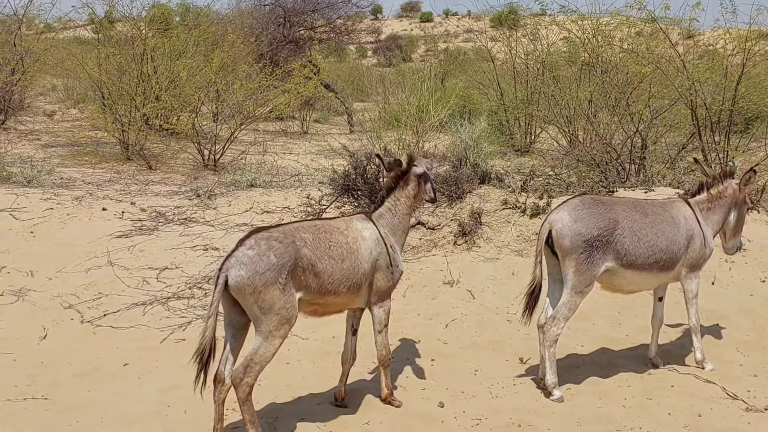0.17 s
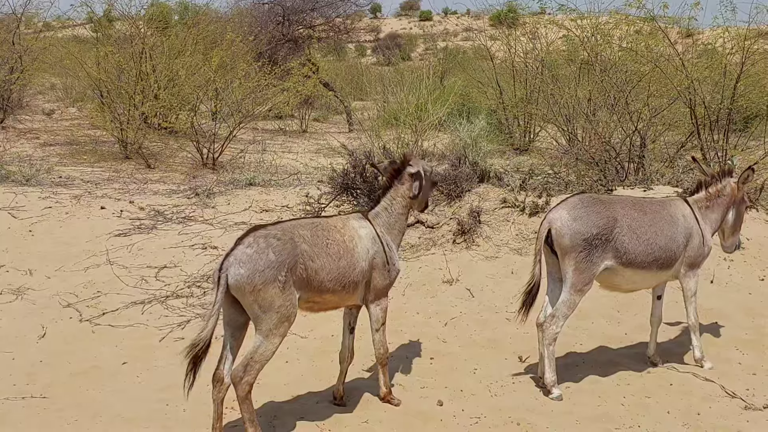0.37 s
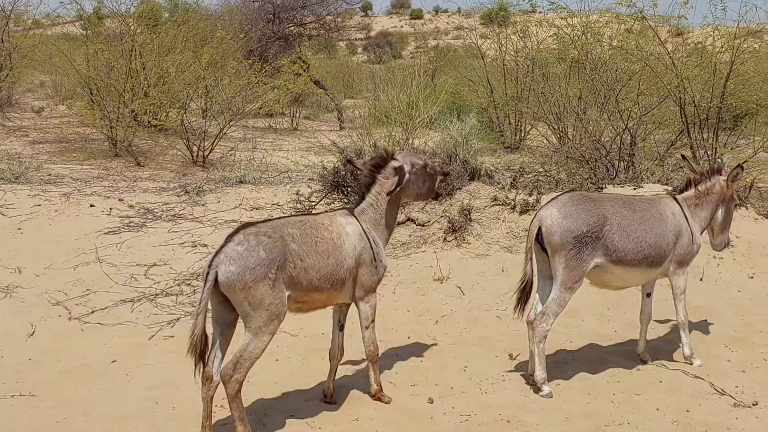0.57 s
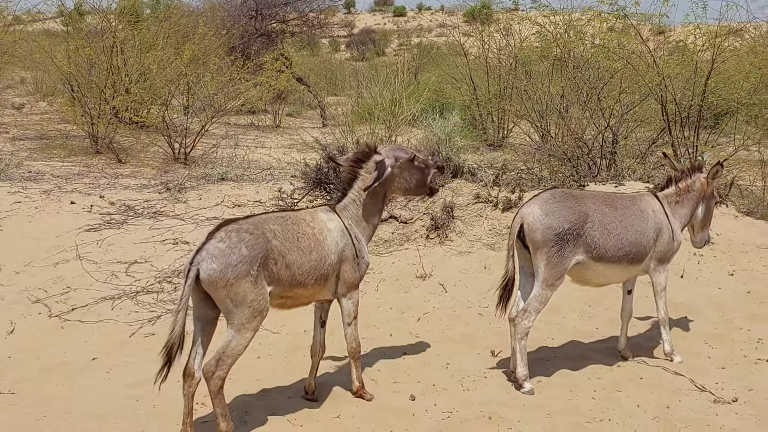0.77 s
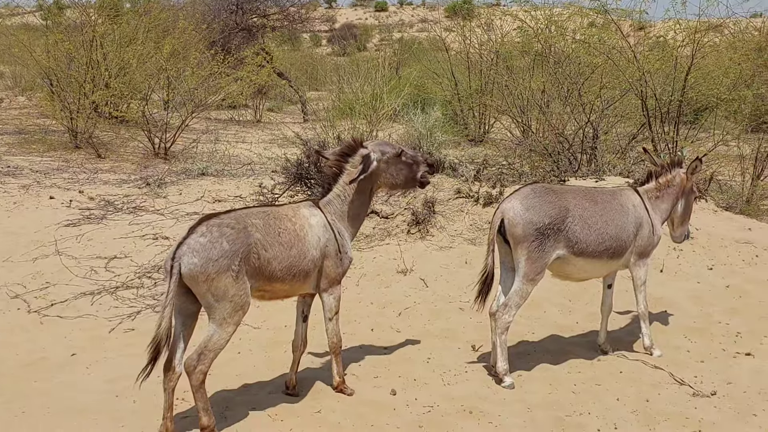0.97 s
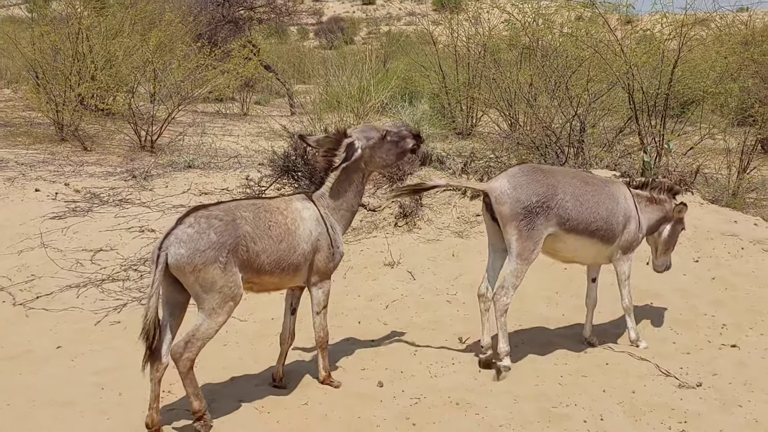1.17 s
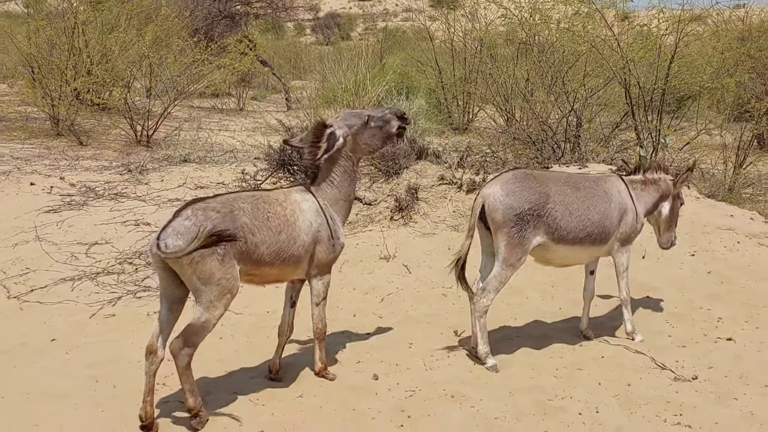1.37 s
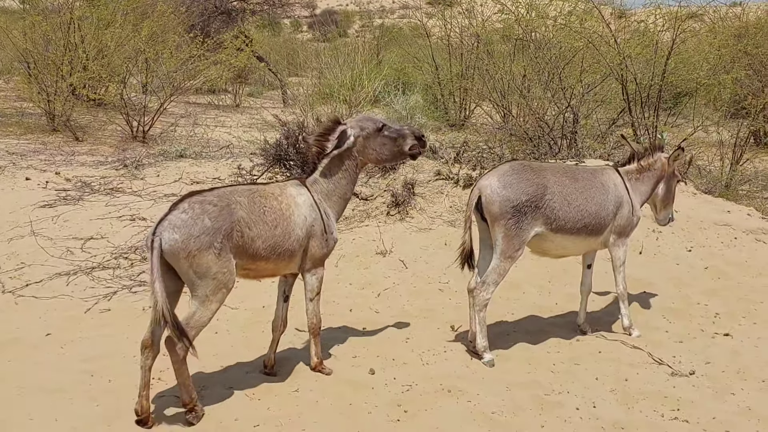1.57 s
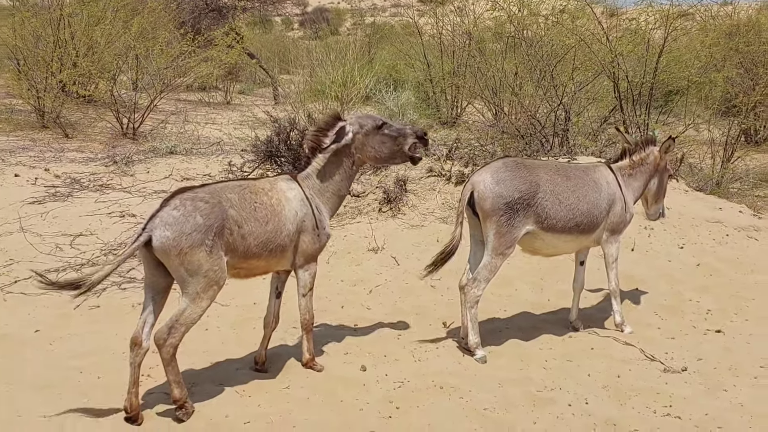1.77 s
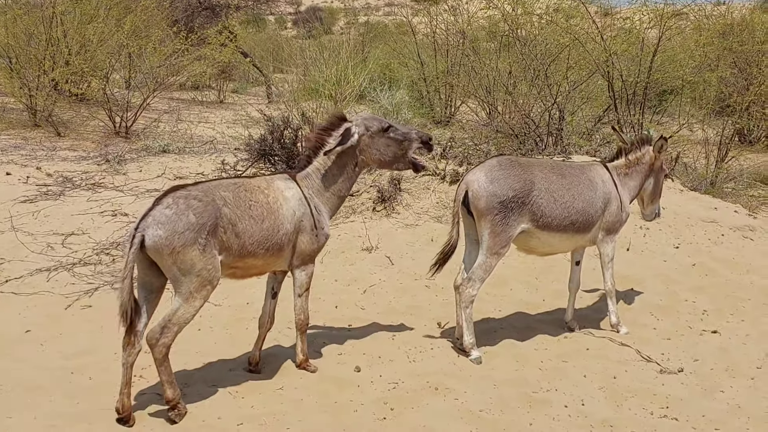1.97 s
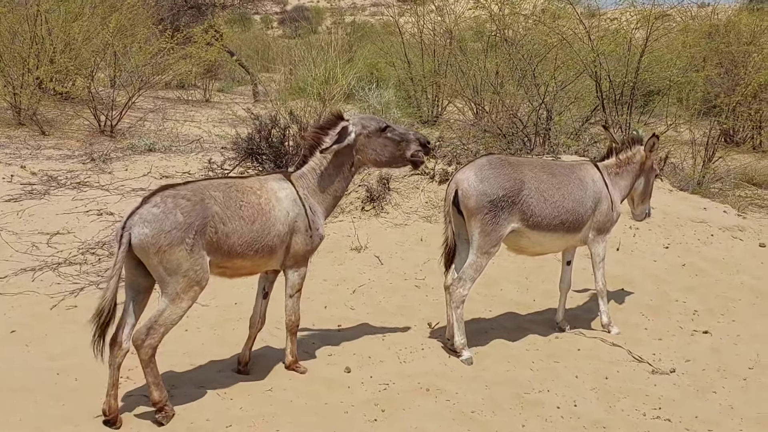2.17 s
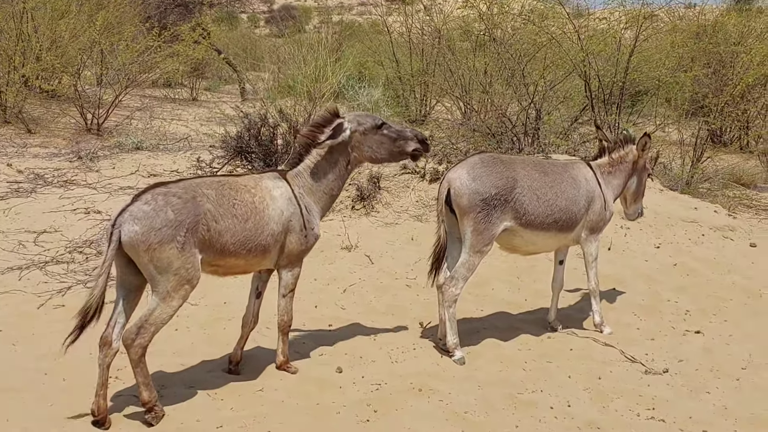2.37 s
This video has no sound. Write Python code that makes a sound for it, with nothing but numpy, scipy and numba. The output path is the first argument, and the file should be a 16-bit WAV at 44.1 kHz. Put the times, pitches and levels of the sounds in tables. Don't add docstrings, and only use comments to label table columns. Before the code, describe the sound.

A donkey brays close by, three wheezing hee-haws with whistling in-breaths and hoarse fluttering out-breaths

```python
import sys
import numpy as np
from scipy import signal
from scipy.fft import rfft, irfft
from scipy.io import wavfile
from scipy.ndimage import uniform_filter1d
from numba import njit

SR = 44100
rng = np.random.default_rng(int(sys.argv[2]) if len(sys.argv) > 2 else 0)


def boost_factor(decibels):
    exponent = np.asarray(decibels, float) / 20
    return 10 ** exponent


def waveform_to_disk(signal):
    frames = np.transpose(np.atleast_2d(signal))
    scaled = np.clip(frames, -1, 1) * 32767
    samples = np.round(scaled).astype(np.int16)
    wavfile.write(sys.argv[1], SR, samples)


N = 112455
ABOVE_DB = -16.5


@njit
def svf(x, hz, width):
    y, b, l = np.zeros(len(x)), 0., 0.
    for i in range(len(x)):
        if x[i] != 0:
            g, k = np.tan(np.pi * hz[i] / SR), width / hz[i]
            v = (b + g * (x[i] - l)) / (1 + g * (g + k))
            b, l, y[i] = 2 * v - b, l + 2 * g * v, k * v
    return y


def band(x, hz, width):
    hz = hz * np.ones(N)
    return svf(svf(x, hz, 1. * width), hz, 1. * width)


def unit(x):
    return x / np.sqrt(np.mean(x ** 2))


def walk(rate_hz):
    k = max(int(SR / rate_hz), 1)
    return unit(uniform_filter1d(uniform_filter1d(rng.standard_normal(N), k), k))


def tracks(rows):
    t, rows = np.arange(N) / SR, np.array(rows)
    is_open = (t > rows[0, 0]) & (t <= rows[-1, 0])
    gate = uniform_filter1d(1. * is_open, size=200, mode="nearest")
    return gate, [np.interp(t, rows[:, 0], c) for c in rows.T[1:]]


def brays():
    # t/s, level/dB, pitch/Hz, mouth resonance f/Hz
    grunt_1 = [
        (.04, -52, 297, 1000),
        (.06, -27.5, 307.7, 941),
        (.135, -41.5, 274.3, 825),
    ]
    haw_1 = [
        (.372, -51.5, 181, 1000),
        (0.384, -23.5, 181.4, 992),
        (0.419, -18.5, 192.2, 797),
        (.443, -23.5, 218.4, 1070),
        (0.474, -14.5, 293.5, 955),
        (.5, -31.5, 312, 993),
    ]
    grunt_2 = [
        (0.553, -47, 297.3, 955),
        (0.564, -30.5, 323.3, 912),
        (0.619, -42.5, 282.3, 817),
    ]
    haw_2 = [
        (.878, -40.5, 289.4, 753),
        (.893, -19.5, 300.9, 1126),
        (0.927, -14, 295.1, 1200),
        (1.001, -17, 280.1, 1111),
        (1.098, -26, 256.7, 826),
        (1.12, -32.5, 261.6, 1010),
        (1.148, -30, 248.8, 1185),
        (1.19, -74, 260, 1156),
    ]
    creak = [
        (1.189, -45, 61.2, 1180),
        (1.3, -52, 62.4, 1157),
        (1.45, -42, 58.7, 770),
        (1.7, -47.5, 61.54, 737),
    ]
    grunt_3 = [
        (1.73, -40, 293.6, 926),
        (1.748, -26.5, 283, 767),
        (1.8, -48, 274.7, 740),
    ]
    cluck = [
        (2.018, -50.5, 290, 865),
        (2.027, -32.5, 291, 850),
        (2.037, -49.5, 277, 840),
    ]
    haw_3 = [
        (2.136, -52.5, 215.4, 620),
        (2.163, -29.5, 215.2, 596),
        (2.195, -21, 228.9, 808),
        (2.205, -18, 230.6, 760),
        (2.3, -24.5, 254.1, 683),
        (2.412, -42, 226.3, 700),
        (2.55, -28, 243.6, 699),
    ]
    # t/s, level/dB
    gasp_levels = [
        [(.125, -55), (.145, -44), (.31, -46), (.33, -64.5)],
        [(.585, -57), (.67, -42.5), (.81, -47.5), (.825, -50.5)],
        [(1.795, -59.5), (1.84, -49), (1.95, -46.5), (1.995, -42.5), (2.02, -45), (2.058, -42), (2.09, -67.5)],
    ]
    gasps = [[(s, db, 300, 819) for s, db in rows] for rows in gasp_levels]

    # chest tone/dB, throat/dB, nose/dB, treble/dB, half-pitch share, treble change/dB
    colours = [
        (-21, -13, -11, -22, 0.52, -5.5),
        (-18, -9, -5, -22.5, .5, 6),
        (0.5, -5, -13, -32, 0.56, 0.5),
        (-5, 0.5, -7, -36, 0.39, 0.5),
        (3, 2, -12.5, -29, .07, -4.5),
        (-41, 9, -7.5, -29.5, -0.9, 3.5),
        (-29, -7, -6, -0.5, 0, -7),
        (-29, 1.5, -3.5, 7, 0, -24),
    ]
    ragged = [(.15, .75, 0, .3), (.2, .8, 0, .3), (.3, .55, .1, .2), (.4, .8, 0, .9), (.7, .4, .45, .9),
              (.9, .9, .2, .1), (1, 1, .3, .3), (1, 1, .2, .2)]
    throat_hz = [710, 608, 620, 700, 638.4, 585, 620, 647]
    nose_hz = [1477, 1467, 1750, 1685, 1477, 1573, 1368, 1505]
    # mouth, throat, nose resonance width/Hz
    widths = [(207.4, 230, 440), (172, 41, 130), (260, 200, 180), (270, 170, 92), (190, 142, 120),
              (260, 200, 150), (173, 47, 290), (166, 120, 660)]
    # f/Hz, width/Hz, level/dB
    upper = [
        [(2354, 390, -2.5), (3270, 410, -5), (4200, 440, -8.5), (4930, 320, -8.5), (5800, 510, -18.5)],
        [(2500, 295, -1), (3160, 730, -5.5), (4010, 410, -2.5), (4680, 270, -8.5), (5840, 1700, -13.5)],
        [(2105, 230, 2.5), (3180, 120, 4.5), (4400, 230, -7), (4800, 290, -7.5), (9000, 15000, -12.5)],
        [(1870, 150, 17), (3250, 220, -17), (4216, 350, -2.5), (4850, 550, -3.5), (5740, 1000, -8)],
        [(2550, 350, 6), (2940, 58, 4.5), (3330, 410, 1.5), (4330, 400, -10), (5600, 360, -8)],
    ]
    breath_in, breath_out = upper[:2], upper[2:]
    by_kind = breath_in + breath_out + upper[-1:] + breath_in
    kinds = zip(colours, ragged, throat_hz, nose_hz, widths, by_kind)
    calls = [[grunt_1, grunt_2], [grunt_3], [haw_1], [haw_2], [haw_3, cluck], [creak], gasps[:2], gasps[2:]]
    return sum(voice(rows, *kind) for group, kind in zip(calls, kinds) for rows in group)


def voice(rows, colour, ragged, throat_hz, nose_hz, widths, upper):
    gate, (db, hz, mouth_hz) = tracks(rows)
    chest_db, throat_db, nose_db, treble_db, half, change_db = colour
    mouth_width, throat_width, nose_width = widths
    along = np.cumsum(gate) / np.sum(gate)
    rough = ragged[0] + (ragged[1] - ragged[0]) * along
    depth = ragged[2] + (ragged[3] - ragged[2]) * along

    phase = np.cumsum(hz * (1 + .12 * rough * walk(150))) / SR
    cycle = phase.astype(int)
    size = boost_factor(4 * rough * rng.standard_normal(N // 20)[cycle]) * (1 - half * (cycle % 2))
    clicks = np.diff(cycle, prepend=0) * size * np.sqrt(SR / hz)
    puffs = .5 + 1.2 * np.exp(-(phase % 1) / .3)
    air = rng.standard_normal(N) * puffs * (gate > 0)
    source = (np.sqrt(1 - rough ** 2) * clicks + rough * air + 1e-9) * (gate > 0)

    low = band(source, mouth_hz, mouth_width) + boost_factor(throat_db) * band(source, throat_hz, throat_width)
    scale = 1 / np.sqrt(np.sum(gate * low ** 2) / np.sum(gate))
    high = np.zeros(N)
    for k, (f, width, gain_db) in enumerate(upper):
        patchy = boost_factor(gain_db + 3 * walk(8.4) + change_db * along)
        high += (-1) ** k * patchy * band(.5 * source + air, f, width)
    nose = band(source, nose_hz, nose_width) * boost_factor(nose_db + 2 * walk(31))
    nose = nose + boost_factor(nose_db - 20 + 2.5 * walk(60)) * band(source, nose_hz, 1396)
    chest_level = boost_factor(chest_db + 4.8 * rough * walk(90)) * (1 - rough) ** 1.92
    chest = chest_level * np.sqrt(2) * np.sin(2 * np.pi * phase)

    flap, flap_db = flaps(gate)
    flap_opening = np.sin(np.pi * flap ** 0.6) ** 2 * boost_factor(flap_db)
    flutter = 1 - depth + depth * 1.33 * flap_opening
    throat = (low - nose) * flutter + boost_factor(treble_db) * high * flutter ** 0.64
    return gate * boost_factor(db) * (scale * throat + chest * np.sqrt(flutter))


def flaps(gate):
    # t/s, strength/dB
    flap_times = [(0.999, -5.5), (1.016, -8), (1.036, -6.5), (1.057, 4), (1.078, -0.5), (1.097, 4.5),
                  (1.116, 2.5), (1.138, 0), (1.167, 5), (1.188, 0), (2.148, -2.5), (2.184, -9), (2.203, 0),
                  (2.217, 1.5), (2.242, -1.5), (2.269, 1.5), (2.291, 0), (2.314, -5), (2.338, -11.5),
                  (2.361, 0), (2.39, -5.5), (2.408, 1), (2.428, 2), (2.444, 5.5), (2.47, 2.5), (2.492, 0.5),
                  (2.511, -4.5), (2.529, -3.5), (2.552, 0)]
    t, (s, db) = np.arange(N) / SR, np.array(flap_times).T
    count = np.interp(t, s, np.arange(len(s)))
    k = np.minimum(count.astype(int), len(s) - 2)
    listed = (t > s[0]) & (s[k + 1] - s[k] < .05)
    flutter_hz = 45 * (1 + 0.073 * walk(28))
    free = np.cumsum((gate > .5) * flutter_hz) / SR % 1
    return np.where(listed, count % 1, free), np.where(listed, db[k], 5.0 * walk(36))


def whistles():
    # t/s, high tone f/Hz, high tone level/dB, low tone f/Hz, low tone level/dB
    hees = [
        [(.128, 5500, -50.5, 2750, -52), (.168, 5680, -41.5, 2755, -29), (.215, 5350, -31.5, 2700, -39.5),
         (.25, 5510, -39, 2740, -30), (.3, 5330, -40, 2600, -44.5), (.33, 5430, -53, 2600, -54.5),
         (.55, 5410, -69, 2600, -73)],
        [(.61, 5260, -53, 2700, -67.5), (.638, 5410, -41, 2715, -32.5), (.675, 5530, -34.5, 2700, -30),
         (.72, 5400, -40.5, 2600, -40), (.8, 5450, -54, 2650, -45.5), (.83, 5400, -66, 2650, -72),
         (.88, 5400, -65, 2650, -51.5)],
        [(1.805, 5250, -51, 2600, -58), (1.835, 5405, -36, 2740, -29), (1.86, 5510, -34, 2770, -32.5),
         (1.9, 5420, -18.5, 2670, -31.5), (1.93, 5337, -28.5, 2520, -44.5), (1.945, 5400, -41.5, 2500, -45.5),
         (2.07, 5385, -67, 2600, -65.5), (2.15, 5430, -65.5, 2600, -71.5)],
    ]
    rasps = [(.35, .65), (.35, .65), (.35, .12)]
    sums_db = [19, 13, -14]
    return sum(hee(*call) for call in zip(hees, rasps, sums_db))


def hee(rows, rasp, sum_db):
    rasp_hz, octave_db = 375, 24.5
    gate, (hz2, db2, hz1, db1) = tracks(rows)
    tones = []
    for hz, db, share in ((hz1, db1, rasp[0]), (hz2, db2, rasp[1])):
        turn = np.exp(2j * np.pi * np.cumsum(hz * (1 + 0.0024 * walk(100))) / SR)
        buzz = np.exp(-2j * np.pi * np.cumsum(rasp_hz * (1 + .12 * walk(60))) / SR)
        shake = (walk(600) + 1j * walk(600)) * 1.47 + 0.42 * buzz
        broken = turn * (np.sqrt(1 - share ** 2) + share * shake)
        tones.append(boost_factor(db + 4.8 * share * walk(70)) * broken)
    low, high = tones
    octave = boost_factor(octave_db) * high ** 2 / (1 + 30 * abs(high))
    sums = boost_factor(sum_db) * low * high + octave
    return gate * np.sqrt(2) * (low + high + sums).real


def moan():
    # t/s, pitch/Hz, level/dB, second partial level/dB
    glide = [
        (.24, 270, -48, -78.5),
        (.31, 422.4, -56, -54.5),
        (.375, 469, -54.5, -37.5),
    ]
    gate, (hz, db1, db2) = tracks(glide)
    phase = 2 * np.pi * np.cumsum(hz) / SR
    return gate * (boost_factor(db1) * np.sin(phase) + boost_factor(db2) * np.sin(2 * phase))


def at_ports(donkey):
    # f/Hz, phase by which left leads/rad, left minus right level/dB
    port_response = [(250, -0.53, 0), (700, -0.75, 3), (1390, 2, -1.5), (2620, 1.96, 2), (4400, 1.5, 0.5),
                     (5400, 1.54, -2), (11000, 2, -1)]
    echo_db, echo_t60_s = -18.5, 0.15
    hz, lead, pan_db = np.array(port_response).T
    f = np.arange(N // 2 + 1) * SR / N
    t = np.arange(SR // 2) / SR
    ears = []
    for side in (.5, -.5):
        level = boost_factor(side * np.interp(f, hz, pan_db))
        port = level * np.exp(1j * side * np.interp(f, hz, lead))
        bushes = rng.standard_normal(len(t)) * boost_factor(-60 * t / echo_t60_s) * (t > .008)
        echo = signal.fftconvolve(donkey, bushes / np.sqrt(np.sum(bushes ** 2)))[:N]
        ears.append(irfft(rfft(donkey) * port, N) + boost_factor(echo_db) * echo)
    return np.array(ears)


def wind():
    # t/s, level/dB
    gusts = [
        (0, -64),
        (.65, -48),
        (.87, -56),
        (1.02, -33.5),
        (1.7, -44),
        (2.08, -55.5),
        (2.3, -46),
    ]
    # t/s, level/dB
    hisses = [
        (.83, -99),
        (1.0, -63.5),
        (1.2, -72.5),
        (1.4, -95.5),
        (1.6, -80),
        (1.84, -58),
        (2.15, -79.5),
    ]
    # t/s, level/dB
    ticks = [
        (1.84, -43),
        (1.849, -44.5),
    ]
    gust_db, hiss_db = tracks(gusts)[1][0], tracks(hisses)[1][0]
    t = np.arange(N) / SR
    grit = sum(boost_factor(db) * (t > s) * np.exp(-abs(t - s) / 0.0032) for s, db in ticks)
    out = []
    for port_db in (-12, 5):
        puff = boost_factor(gust_db + 7.5 + 1.3 * walk(20))
        noise = rng.standard_normal(N)
        upper_rumble = boost_factor(-19.5) * unit(band(noise, 110, 160)) * boost_factor(walk(7.5)) ** 5
        rumble = unit(band(noise, 55, 98)) + upper_rumble
        hiss_level = boost_factor(hiss_db + port_db + 2 * walk(200) - ABOVE_DB)
        thin = unit(band(rng.standard_normal(N), 14200, 3800)) * hiss_level
        thin = thin + unit(band(noise, 11000, 7000)) * grit * boost_factor(port_db - ABOVE_DB)
        out.append(puff * rumble + thin)
    return np.array(out)


def scrub():
    # f/Hz, width/Hz, level/dB
    hush_bands = [
        (700, 300, -56),
        (2600, 1200, -65.5),
        (4540, 3800, -63),
        (11700, 18000, -59.5),
    ]
    out = np.zeros((2, N))
    for port in out:
        for hz, width, db in hush_bands:
            port += boost_factor(db + 2 * walk(7.5)) * unit(band(rng.standard_normal(N), hz, width))
    return out


def scene():
    donkey = brays() + whistles() + moan()
    return at_ports(donkey) + wind() + scrub()


def band_limit(x):
    return signal.sosfilt(signal.butter(12, 15780, fs=SR, output="sos"), x)


def record(dry):
    mic_hz = 5973
    low = signal.sosfilt(signal.cheby2(8, 50, mic_hz * 1.302, fs=SR, output="sos"), dry)
    high = signal.sosfilt(signal.butter(4, 8500, "high", fs=SR, output="sos"), dry)
    return band_limit(low + boost_factor(ABOVE_DB) * high)


dry = scene()
out = record(dry)
waveform_to_disk(out)
```